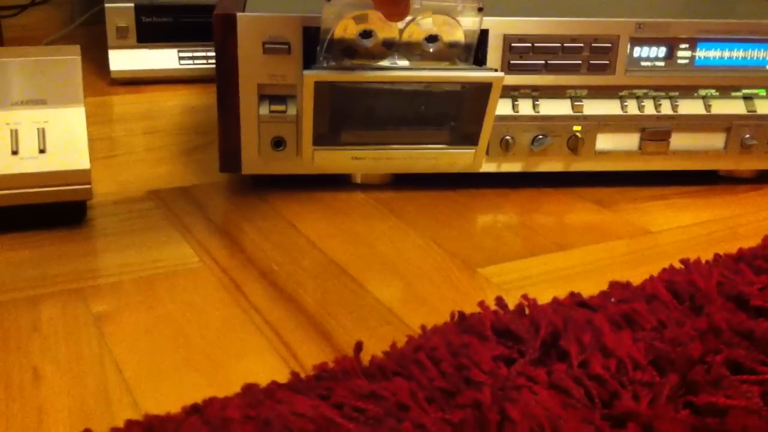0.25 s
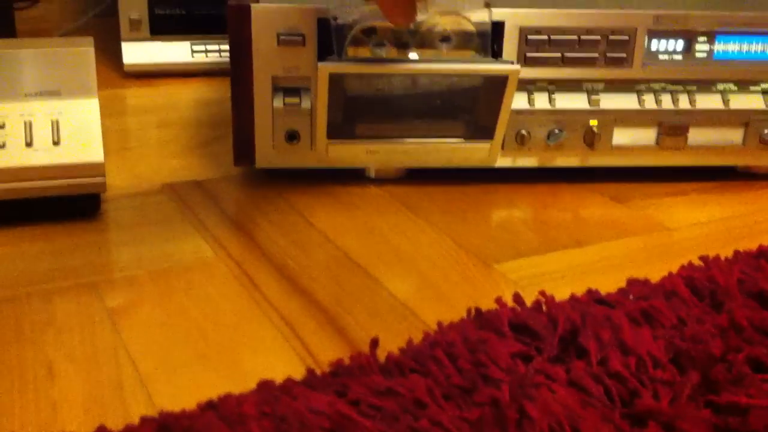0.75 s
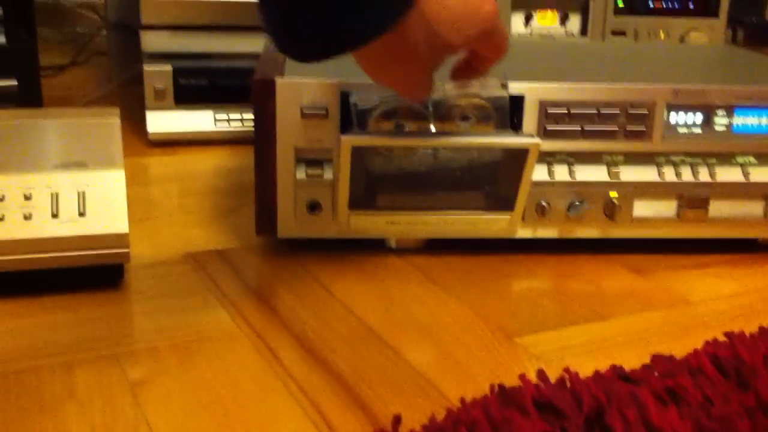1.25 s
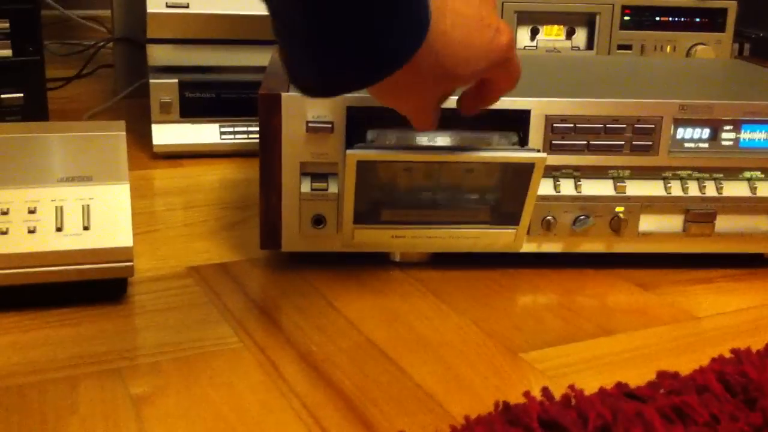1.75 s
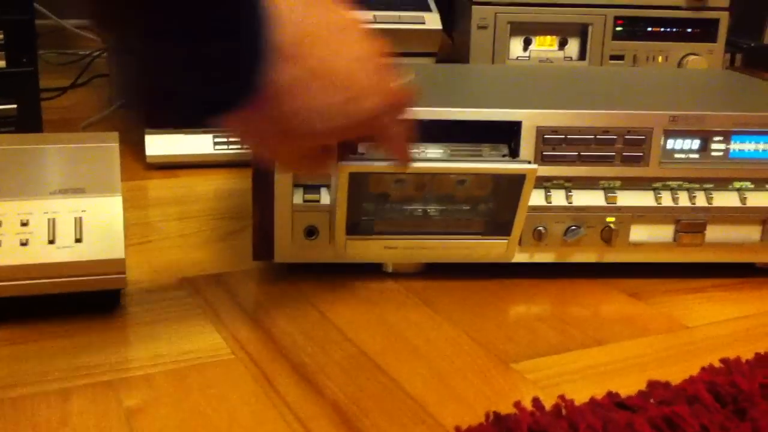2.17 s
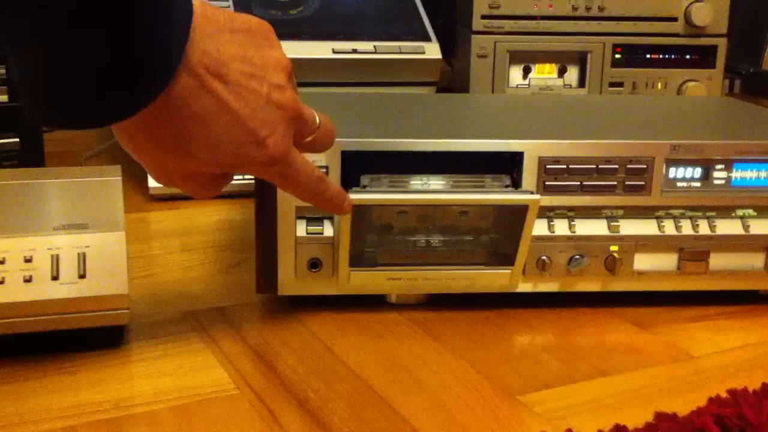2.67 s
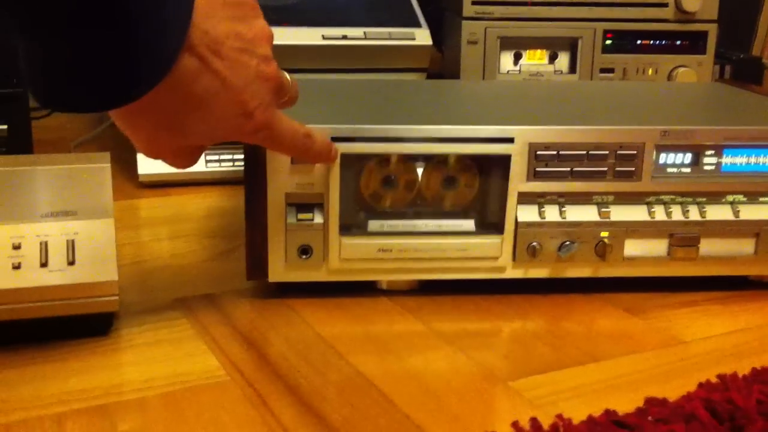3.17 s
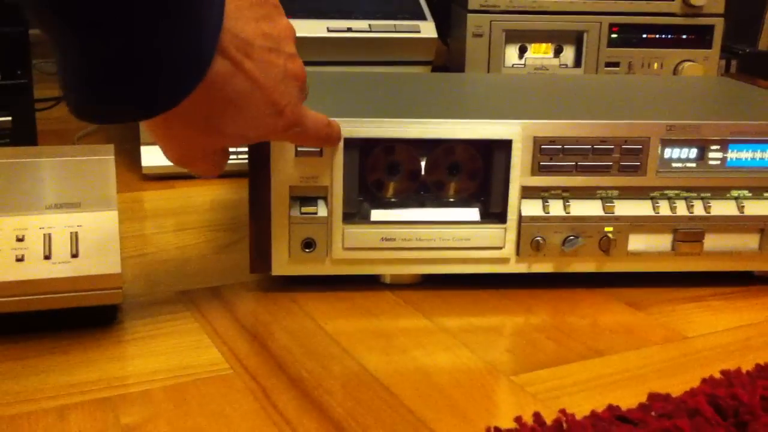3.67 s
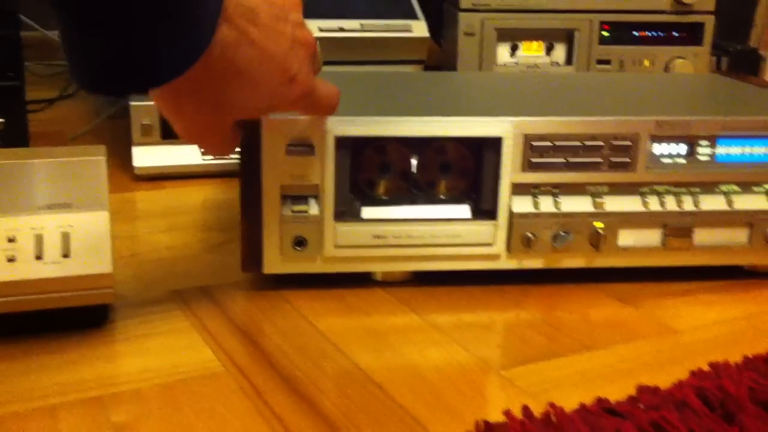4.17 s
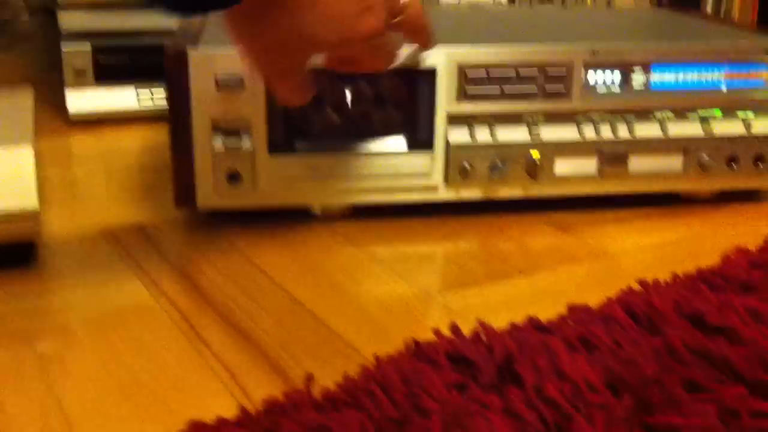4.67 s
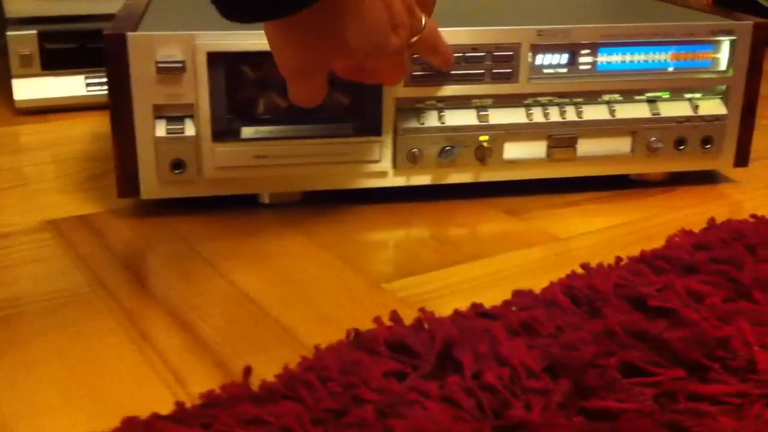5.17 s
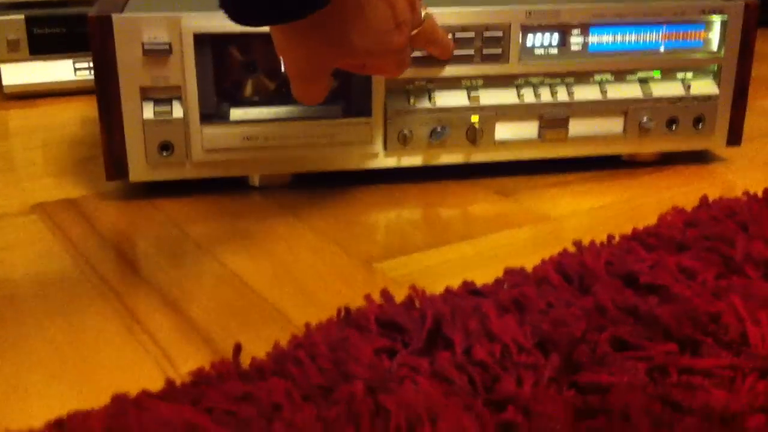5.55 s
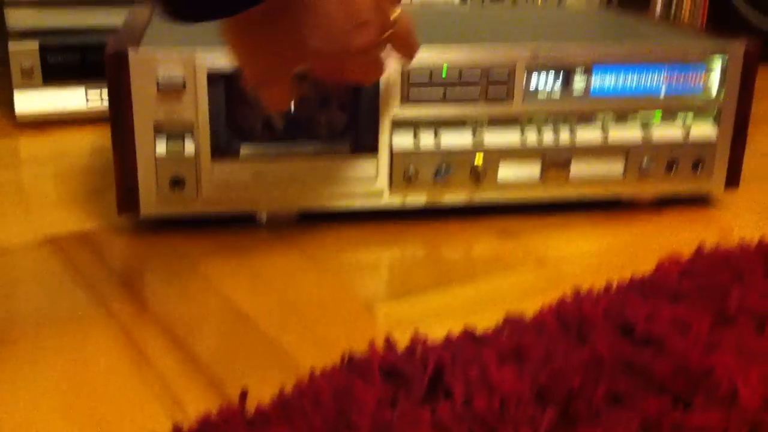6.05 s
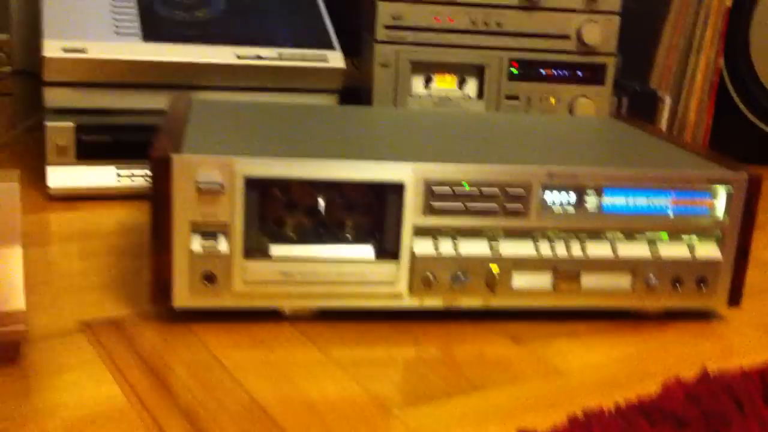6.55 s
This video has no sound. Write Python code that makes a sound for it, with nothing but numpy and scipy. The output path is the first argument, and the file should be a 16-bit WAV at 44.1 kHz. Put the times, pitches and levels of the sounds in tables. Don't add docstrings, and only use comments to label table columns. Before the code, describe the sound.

A plastic cassette rattles and thumps into a tape deck, its door snaps shut, then a fingernail taps it in a quiet room.

```python
import sys
import numpy as np
from scipy import signal
from scipy.fft import rfft, irfft
from scipy.io import wavfile

SR = 44100
rng = np.random.default_rng(int(sys.argv[2]) if len(sys.argv) > 2 else 0)


def waveform_to_disk(signal):
    frames = np.transpose(np.atleast_2d(signal))
    scaled = np.clip(frames, -1, 1) * 32767
    samples = np.round(scaled).astype(np.int16)
    wavfile.write(sys.argv[1], SR, samples)


def invert_db(level):
    return 10 ** (np.asarray(level, dtype=float) / 20)


N = 300762


def rms_one(x):
    return x / np.sqrt(np.mean(x ** 2) + 1e-20)


def peak_one(x):
    return x / (np.abs(x).max() + 1e-20)


def at_hz(points, hz):
    f, value = np.array(points).T
    return np.interp(np.log(hz), np.log(f), value)


def band(x, low_hz, high_hz):
    return signal.sosfilt(signal.butter(2, [low_hz, high_hz], "band", fs=SR, output="sos"), x)


def ring(force, hz, t60):
    r, w = invert_db(-60 / (t60 * SR)), 2 * np.pi * hz / SR
    return signal.lfilter([0, np.sin(w)], [1, -2 * r * np.cos(w), r * r], force + 1e-18)


def body(force, modes, spread_db):
    out = 0
    for k, (hz, db, t60) in enumerate(modes):
        out = out + (-1) ** k * invert_db(db + spread_db[k]) * ring(force, hz, t60)
    return out


def swell(s, rise_s, fall_s, db):
    t = np.arange(N) / SR - s
    return invert_db(db - 20 * np.maximum(-t / max(rise_s, .004), t / max(fall_s, .004)))


# f/Hz, level/dB, T60/s
WELL = [(860, 3, 0.015), (970, -7, 0.04), (1054, 1, 0.055), (1157, -17.5, 0.12), (1260, -2.5, .04),
        (1405.5, -3, 0.011), (1547, -9.5, .03), (1620, -13, 0.025)]
# f/Hz, level/dB, T60/s
SHELL = [(2750, -7.5, .01), (3050, -2, 0.002), (3717, 9, 0.0037), (5331, -15.5, 0.0089),
         (6290, -0.5, 0.022), (8840, -7, 0.031), (9330, -8, 0.042), (14100, 1.5, .03)]
# f/Hz, level/dB, T60/s
CABINET = [(219.8, -0.5, 0.064), (270, -4, 0.11), (330, -5, .06), (418.3, -4, 0.035), (523, 3.5, 0.014),
           (700, 2.5, 0.039)]
WELL_IN_ROOM = .52


def contacts(rows, modes_share, dull_hz):
    out, length = np.zeros((2, N + SR)), int(.4 * SR)
    t = np.arange(length) / SR
    click = 1. * (t == 0)
    push = np.sin(np.pi * np.clip(t / 0.00086, 0, 1))
    edge_hz = min(dull_hz, .45 * SR)
    even = rms_one(band(click + modes_share * .06 * body(click, SHELL, np.zeros(10)), 2100, edge_hz))
    knock = rms_one(band(band(click, 1000, 1680), 1000, 1680))
    for s, db, hz, bright_db, low_db, chatter_ms in rows:
        ticks = rng.standard_normal(length) * invert_db(2 * np.minimum(rng.exponential(1, length), 4))
        place = 3 * rng.standard_normal((3, 10))
        tau = max(chatter_ms, .3) / 1000
        pulse = t / tau * np.exp(-t / tau)
        force = ticks * pulse

        swing = pulse * np.sin(2 * np.pi * hz * t)
        well = peak_one(swing) + .5 * peak_one(ring(force, hz, .015))
        well = well + .45 * peak_one(body(force, WELL, place[0]))
        well = peak_one(band(well, 720, 1960))

        shell = peak_one(force) + modes_share * peak_one(body(force, SHELL, place[1]))
        shell = invert_db(bright_db) * peak_one(band(shell, 2100, edge_hz))

        cabinet = invert_db(low_db) * peak_one(body(push, CABINET, place[2] / 2))
        cabinet = cabinet + invert_db(-15.5) * peak_one(band(force, 380, 850))

        direct = cabinet + well + shell
        diffuse = cabinet + WELL_IN_ROOM * well + well.std() * 0.45 * knock + shell.std() * even
        at = int((s - .0015) * SR)
        out[:, at:at + length] += invert_db(db) * np.array([direct, diffuse])
    return out[:, :N]


USUAL_DB = -40
CABINET_LAG = 0.52


def action(rows, cabinet_db, chatter_ms):
    return [(s, db, hz, bright_db, cabinet_db - CABINET_LAG * (db - USUAL_DB), chatter_ms)
            for s, db, hz, bright_db in rows]


# f/Hz, rms level/dB, waver/dB
HUM = [(96.9, -81, 5), (146.3, -73, 2), (237, -79.5, -1), (390, -81.5, 2), (534, -87.5, 2), (1292, -90, -2),
       (1410, -90, 0)]


def hum():
    t, out = np.arange(N) / SR, np.zeros(N)
    for hz, db, waver_db in HUM:
        knots = rng.standard_normal(60)
        waver = waver_db * np.interp(t, np.linspace(0, t[-1], 60), knots)
        out += np.sqrt(2) * invert_db(db + waver) * np.sin(2 * np.pi * hz * t)
    return out


# f/Hz, density level/dB
FLOOR = [(65, -42), (110, -19), (150, -0.5), (200, -6), (250, -7.5), (330, -11), (590, -14), (1500, -17.5),
         (4000, -20), (12600, -22.5), (15200, -20), (16000, -22.5), (16500, -41.5)]


def hiss():
    hz = np.fft.rfftfreq(N, 1 / SR) + 1
    noise = irfft(rfft(rng.standard_normal(N)) * invert_db(at_hz(FLOOR, hz)), N)
    return invert_db(-68) * rms_one(noise)


# loudest t/s, rise/s, fall/s (each over 20 dB), well level/dB, shell re well/dB
SLIDES = [
    (0.0, .011, 0.074, -53, -12),
    (0.691, 0.025, 0.03, -46.5, -2),
    (1.0, 0.017, 0.081, -67, -14),
    (1.13, .021, 0.27, -65, -28),
    (1.821, .09, 0.033, -49, -3.5),
    (3.358, 0.084, .12, -65.5, 1.5),
    (3.505, 0.04, 0.04, -40, -17),
    (3.43, 0.046, .45, -57.5, -22),
    (5.557, 0.017, 0.014, -40.5, -5),
    (5.64, 0.069, 0.6, -62, -8),
]


def slides():
    grains = rng.standard_normal(N) * invert_db(2.8 * np.minimum(rng.exponential(1, N), 4))
    well = rms_one(body(grains, WELL, np.zeros(10)))
    well = rms_one(well + .8 * rms_one(band(grains, 970, 1700)))
    shell = .5 * rms_one(body(grains, SHELL, np.zeros(10)))
    shell = rms_one(rms_one(band(grains, 1700, 16000)) + shell)
    out = np.zeros(N)
    for s, rise, fall, db, bright_db in SLIDES:
        out += swell(s, rise, fall, db - 3.5) * (well + invert_db(bright_db) * shell)
    return out


# f/Hz, T60/s
ROOM_T60 = [(120, .5), (300, .45), (700, .32), (1300, .45), (2000, .43), (4000, .32), (7000, .27),
            (12000, .23)]
# f/Hz, level/dB
ROOM_COLOUR = [(120, 0), (400, -2), (750, -0.5), (1200, -5.5), (1900, -1.5), (3000, -3.5), (6000, -4),
               (15000, -6)]


def room(x, level_db):
    t = np.arange(int(.8 * SR)) / SR
    white = rng.standard_normal((2, len(t)))
    edges = 90 * 2 ** np.arange(0, 7.8, .5)
    tail = np.zeros(len(t))
    for k, (lo, hi) in enumerate(zip(edges, edges[1:])):
        centre = np.sqrt(lo * hi)
        decay_db = at_hz(ROOM_COLOUR, centre) - 60 * t / at_hz(ROOM_T60, centre)
        tail += band(white[k % 2], lo, hi) * invert_db(decay_db)
    tail *= np.clip((t - .004) / 0.003845, 0, 1)
    return invert_db(level_db) * signal.fftconvolve(x, tail / np.sqrt(np.sum(tail ** 2)))[:N]


# t/s, peak level/dB, well f/Hz, shell re peak/dB
KNOCKS = [(0.11, -36.5, 1300, -6), (0.133, -28.5, 1416, 3.5), (0.141, -36, 1250, 1),
          (0.202, -51.5, 706, -4), (0.38, -37, 1413, -7), (0.385, -48, 1210, -11), (0.43, -46, 1320, 9),
          (0.443, -37, 1450, 4.5), (0.46, -28.5, 1410, 2.5), (0.477, -31.5, 1270, 5),
          (0.625, -44, 1360, -5), (0.662, -51, 910, -23), (0.672, -47, 1400, -6), (0.68, -44, 1400, 6.5),
          (0.692, -40, 1106, 1.5), (0.723, -50.5, 965, 0)]
# t/s, peak level/dB, well f/Hz, shell re peak/dB
GUIDING = [(0.914, -47.5, 980, -4), (0.922, -42, 1090, 0.5), (0.959, -46.5, 1310, 15),
           (0.963, -21.5, 1316, -2), (0.98, -34.5, 1280, -6), (0.991, -35.5, 1470, -2),
           (1.039, -38.5, 1490, -5), (1.116, -42, 1250, -2), (1.126, -36.5, 1350, -3),
           (1.385, -61.5, 1540, 12.5), (1.434, -36, 1410, 5), (1.452, -38.5, 1360, -12),
           (1.589, -53.5, 960, -8)]
# t/s, peak level/dB, well f/Hz, shell re peak/dB
SEATING = [
    (1.81, -52, 1378, -7),
    (1.826, -41, 1310, -3.5),
    (1.832, -38, 1280, -12.5),
    (1.864, -23.5, 1096, -3.5),
    (1.8675, -18.5, 1305, -5.5),
    (1.8765, -9.5, 1260, -6),
    (1.88, -14, 1260, -1),
    (1.886, -20.5, 1220, -7.5),
    (1.907, -33.5, 1260, 2.5),
    (1.911, -26, 1190, -2.5),
]


def cassette():
    rows = action(KNOCKS, cabinet_db=-15, chatter_ms=2.08) + action(GUIDING, cabinet_db=-15.5, chatter_ms=1.8)
    rows += action(SEATING, cabinet_db=-18.5, chatter_ms=1.536)
    return contacts(rows, 0.29, dull_hz=12670)


# t/s, peak level/dB, f/Hz, T60/s
PINGS = [(0.136, -52, 6400, .06), (0.462, -50, 6300, .06), (0.981, -46, 6270, .05),
         (0.965, -48, 13820, .08), (1.040, -46, 3660, .012), (1.89, -37, 1250, .5), (1.892, -41, 1283, .5),
         (1.895, -42, 1150, .5), (1.907, -36, 6250, .07), (3.195, -48, 3650, .01), (3.402, -49, 6360, .03),
         (3.523, -27, 2520, .03), (3.742, -46, 560, .008), (5.537, -30, 13000, .006),
         (5.540, -32, 11000, .008), (5.542, -33, 15000, .008), (5.545, -48, 1040, .35)]


def pings():
    out, click = np.zeros(N), np.arange(SR // 2) == 0
    for s, db, hz, t60 in PINGS:
        at = int(s * SR)
        out[at:at + SR // 2] += invert_db(db) * ring(click, hz, t60)
    return out * invert_db(np.array([[0], [-9]]))


# loudest t/s, rise/s, fall/s, level/dB
SLEEVE = [
    (2.406, .16, 0.056, -70),
    (6.4, .12, 1.13, -76.5),
    (6.75, 0.15, .4, -71.5),
]


def sleeve():
    cloth = rms_one(band(rng.standard_normal(N), 2700, 14000))
    return sum(swell(*row) for row in SLEEVE) * cloth


# t/s, peak level/dB, well f/Hz, shell re peak/dB
SWING = [
    (2.987, -48, 1330, -12),
    (3.022, -40, 1207, -15.5),
    (3.112, -54, 1310, -11),
    (3.195, -35.5, 1187, -15.5),
]
# t/s, peak level/dB, well f/Hz, shell re peak/dB
CLOSING = [
    (3.349, -51.5, 1260, -2),
    (3.401, -42.5, 1360, -11.5),
    (3.419, -48, 920, -8),
    (3.43, -46.5, 1420, -18),
    (3.445, -53, 970, -7),
    (3.481, -46, 1340, -30),
    (3.494, -39.5, 1430, -6.5),
    (3.504, -34.5, 1400, -10.5),
]
# t/s, peak level/dB, well f/Hz, shell re peak/dB
LATCH = [
    (3.521, -20, 1280, -5),
    (3.526, -22, 873, 1.5),
    (3.534, -20, 1490, -7.5),
]
# t/s, peak level/dB, well f/Hz, shell re peak/dB
SETTLE = [
    (3.742, -44, 853, -16),
]


def door():
    rows = action(SWING, cabinet_db=-15, chatter_ms=1.7) + action(CLOSING, cabinet_db=-11.5, chatter_ms=2.9)
    rows += action(SETTLE, cabinet_db=-7, chatter_ms=0.62)
    latch = action(LATCH, cabinet_db=-3, chatter_ms=1.5)
    return contacts(rows, 0.24, dull_hz=6500) + contacts(latch, 0.55, dull_hz=12000)


# t/s, peak level/dB, well f/Hz, shell re peak/dB
FIRST_TAP = [
    (5.528, -58, 1380, 6.6),
    (5.538, -35.5, 1428, 5.8),
    (5.540, -33.5, 1447, 1.3),
    (5.607, -43.5, 1040, 6),
]
# t/s, peak level/dB, well f/Hz, shell re peak/dB
TAPS = [
    (5.707, -44, 1380, 5.5),
    (5.714, -44.5, 1410, 2.2),
    (5.747, -37.5, 970, 3),
    (5.757, -38.5, 1410, 7.7),
]
# t/s, peak level/dB, well f/Hz, shell re peak/dB
LAST_TAP = [
    (5.846, -41.5, 880, 12.5),
    (5.851, -38.5, 1220, 8),
    (5.858, -36, 1312, 0.5),
    (5.880, -50, 1015, -10),
]


def taps():
    rows = action(FIRST_TAP, cabinet_db=-15, chatter_ms=2.64) + action(TAPS, cabinet_db=-11.5, chatter_ms=2.6)
    rows += action(LAST_TAP, cabinet_db=-4, chatter_ms=2.2)
    return contacts(rows, 0.25, dull_hz=15900)


# f/Hz, level/dB, T60/s
PANEL = (504, -60, 1.7)


def panel():
    hz, db, t60 = PANEL
    t = np.maximum(np.arange(N) / SR - 5.86, 0)
    return invert_db(db - 60 * t / t60) * (1 - np.exp(-t / 0.032)) * np.sin(2 * np.pi * hz * t)


def scene():
    loading = cassette() + slides() + sleeve() + pings()
    closing = door()
    tapping = taps()
    wet = room(loading[1], -8.5) + room(closing[1], -9.0) + room(tapping[1], -9.5)
    background = hum() + hiss()
    return (loading[0] + closing[0] + tapping[0] + wet + panel() + background)[None]


def band_limit(x):
    return signal.sosfilt(signal.butter(12, 16820, fs=SR, output="sos"), x)


def record(dry):
    heard = signal.sosfilt(signal.butter(4, 115, "high", fs=SR, output="sos"), dry)
    rumble = invert_db(-103) * rms_one(band(rng.standard_normal(N), 12, 85))
    heard = heard - 0.055 * heard ** 2 + rumble
    heard = signal.sosfilt(signal.cheby2(12, 60, 16700, fs=SR, output="sos"), heard)
    return band_limit(heard)


dry = scene()
out = record(dry)
waveform_to_disk(out)
```